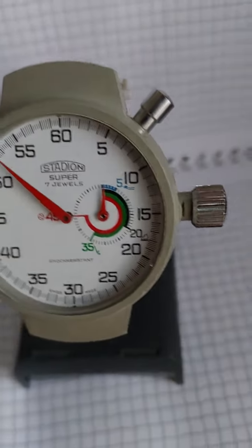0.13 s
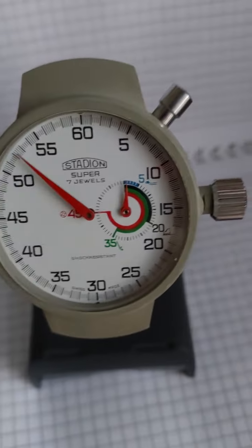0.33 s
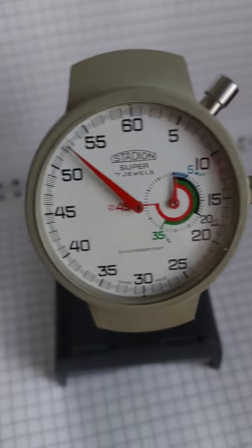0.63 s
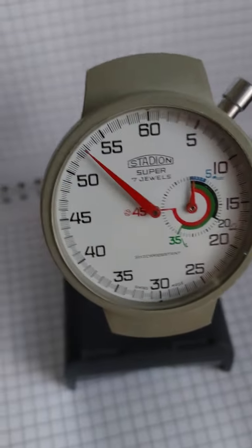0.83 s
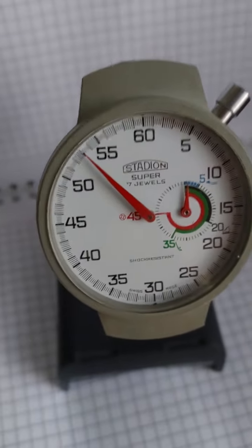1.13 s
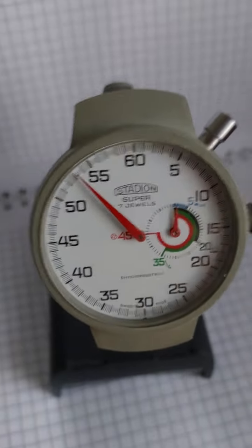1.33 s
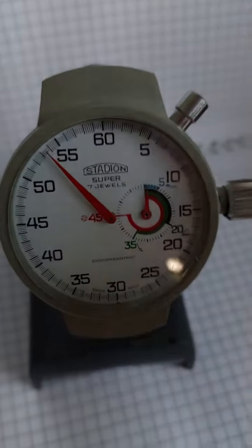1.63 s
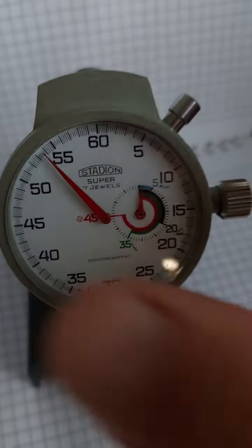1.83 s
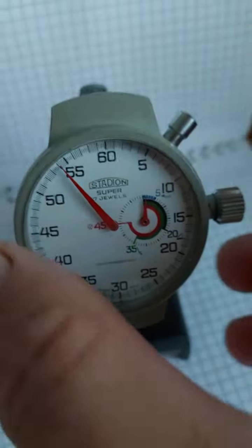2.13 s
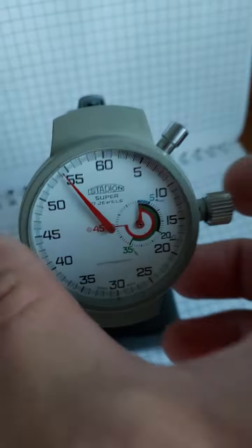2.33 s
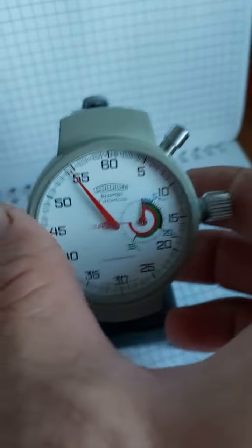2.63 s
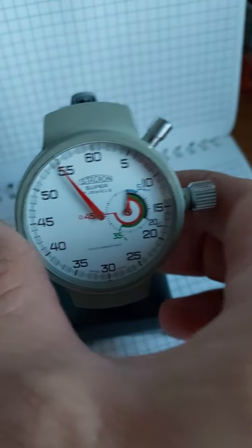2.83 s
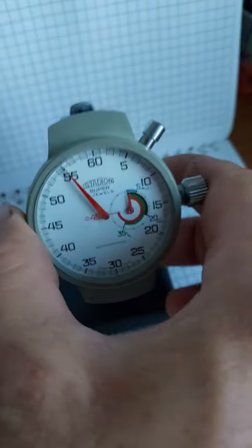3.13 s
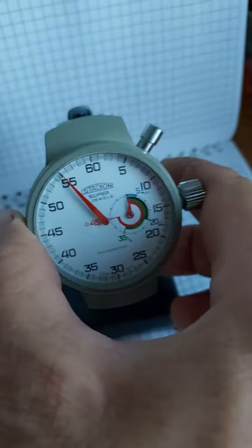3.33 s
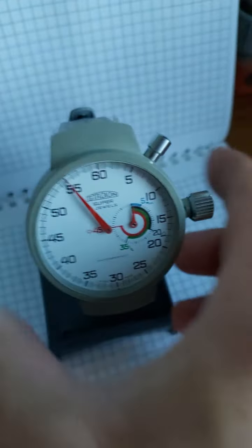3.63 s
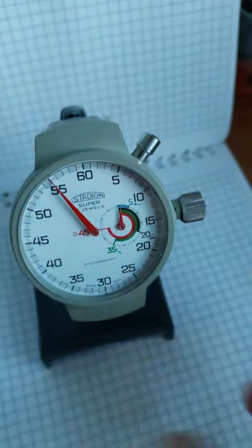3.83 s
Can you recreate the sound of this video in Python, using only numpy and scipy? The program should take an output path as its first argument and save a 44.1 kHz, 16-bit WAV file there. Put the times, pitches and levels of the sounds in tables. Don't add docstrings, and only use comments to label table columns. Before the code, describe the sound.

Soft rapid stopwatch ticking over low rumble, hiss and distant birds; a bump on the handheld microphone's right side, later a grip and sharp metal press stopping the ticks, then a lighter return click and loose rattle.

```python
import sys
import numpy as np
from scipy import signal
from scipy.fft import rfft, irfft
from scipy.io import wavfile
from scipy.ndimage import uniform_filter1d

SR = 44100
rng = np.random.default_rng(int(sys.argv[2]) if len(sys.argv) > 2 else 0)


def materialize(psi):
    bounded = np.clip(np.atleast_2d(psi).T, -1, 1)
    quanta = np.round(bounded * 32767).astype(np.int16)
    wavfile.write(sys.argv[1], SR, quanta)


def level_to_linear(level):
    exponent = np.asarray(level, float) / 20
    return 10 ** exponent


N = 176400

# t/s, level/dB
RUMBLE_SWELL = [(0, -65.5), (.18, -49.5), (.33, -69.5), (0.582, -50), (.7, -66), (.78, -56.5), (.95, -70.5),
                (1.08, -53), (1.45, -50), (1.53, -65), (1.6, -53), (1.85, -61.5), (2.02, -56), (2.23, -75),
                (2.38, -57.5), (3.201, -57), (3.85, -60), (4, -51)]
# f/Hz, level/dB
RUMBLE_TONE = [(20, -40), (36, -18), (58, 5.5), (68, -9), (95, -10), (180, -35.5), (600, -86.5)]

# f/Hz, left minus right/dB
HISS_PAN = [(180, -7), (550, -10), (1650, -5.5), (5000, -11.5), (15000, -7)]
# f/Hz, likeness/1
HISS_LIKENESS = [(100, 0.91), (800, 0.06), (4000, 0.16), (12000, 0.15)]
# f/Hz, density/dB
AIR_TONE = [(60, -21), (110, -3.5), (200, 1), (330, -8.5), (550, -5.5), (1000, -8.5), (1600, -18.5),
            (2600, -20.5),
            (4000, -15.5), (5500, -15.5), (7000, -19.5), (8300, -29.5), (10000, -24.5), (13000, -19),
             (15700, -20)]
# t/s, level/dB
MURMUR_SWELL = [(0, 4), (.3, 0), (.6, 3), (.8, -.5), (1.5, 2), (2.1, -1), (2.6, 1), (3, 3.5), (4, 3)]
HISS_DB = -67
HISS_EDGE_HZ, EDGE_HZ = 15950, 16900

# t/s, level/dB
TICK_NEARNESS = [(0, -55.5), (1, -56.5), (2, -57), (2.8, -58.5), (3.2, -59)]
# f/Hz, level/dB
TICK_TONE = [(3000, -39), (5200, -6), (6400, 1), (8500, -19), (11000, -1.5), (14500, -1.5), (15800, -1),
             (16500, -30.5)]
BEAT_S, FIRST_S, TOCK_EARLY_S, UNLOCK_S = .2, .186, .004, .012
TICK_UNLOCK_DB, TOCK_UNLOCK_DB, TOCK_DB, TICK_PAN_DB = -8.5, -24, -1.5, -9.5

# t/s, level/dB, f/Hz
CHIRPS = [(0.195, -66, 4864), (0.554, -70.5, 4830), (0.784, -64.5, 5074), (1.08, -66.5, 5210),
          (1.338, -68.5, 6150), (1.769, -79, 4640), (1.99, -68.5, 4570), (2.138, -74.5, 4460),
          (2.314, -68.5, 4600), (2.926, -68, 4695)]
# t/s, level/dB, f/Hz
SPARROW_NOTES = [(.235, -65, 4940), (.59, -63, 4810), (.788, -62, 3780), (.808, -62.5, 6330),
                 (0.815, -55.5, 4630), (.819, -57, 5370), (.835, -66, 5110), (1.083, -52, 5430),
                 (1.083, -62.5, 3990), (1.108, -58, 5430), (1.116, -67.5, 3910), (1.136, -66, 5440),
                 (2.03, -61, 4670)]
# t/s, level/dB, f/Hz
COOS = [
    (1.5, -64, 717),
    (1.69, -62, 750),
    (2.21, -71, 750),
    (2.4, -72, 755),
]
CHIRP_S, TRILL_PER_S, CHIRP_SPREAD, CHIRP_PAN_DB, COO_S = .085, 38, .36, -7.5, .12
BIRD_ROOM_DB, NOTE_ROOM_DB = 1.5, -7

# t/s, level/dB, f/Hz
THUDS = [
    (1.12, -62, 250),
    (1.592, -50, 245),
    (1.611, -50.5, 228),
    (1.632, -51, 237),
]
# t/s, level/dB, width/s, direction and size/1
PORT_PUSHES = [(1.212, -42.5, 0.0037, -1.7), (1.2434, -27.5, 0.0017, -1.8), (1.245, -21, 0.0058, 0.8),
               (1.247, -19.5, 0.00042, -0.72), (1.2479, -20, 0.0018, -0.88), (1.2505, -31.5, 0.0052, -1.26),
               (1.2553, -28.5, 0.0035, 1), (1.26, -38.5, 0.0044, 1), (1.264, -38, 0.0071, -1.6)]
# t/s, level/dB, clatter/s
SHELL_SNAPS = [(1.204, -62, .0015), (1.2096, -50, .0015), (1.2116, -49, .0005), (1.2144, -32.5, .0005),
               (1.2438, -46, 0.0013), (1.247, -20.5, 0.00071), (1.2482, -35.5, 0.0025),
               (1.2505, -38, 0.0038), (1.2658, -45.5, 0.00044), (1.284, -50.5, .002), (1.293, -54, 0.0043)]
# f/Hz, level/dB
SNAP_TONE = [(300, -13.5), (1200, 0), (3000, -4.5), (6400, -2.5), (8600, -14), (11000, -8), (15900, -10),
             (16900, -22)]
LEAK_DB = -41

# t/s, length/s, level/dB, slip rate/Hz
SQUEAK = (3.132, .046, -47, 480)
# f/Hz, width/Hz, level/dB
SQUEAK_BODY = [(917, 90, 0), (1410, 125, -3), (2880, 270, -8), (5490, 4400, -32.5)]
SQUEAK_CATCH_S = 0.015
# t/s, level/dB, clatter/s
GRIP = [
    (3.1782, -40.5, 0.0015),
    (3.216, -64.5, 0.0034),
    (3.233, -54, .003),
    (3.305, -45.5, 0.0027),
]
# f/Hz, level/dB
GRIP_TONE = [(300, -14.5), (600, -10), (1450, 0), (1850, 0.5), (2900, -6), (4600, -14), (9000, -16),
             (15500, -17)]

PRESS_S = 3.3424
# t/s, level/dB, clatter/s
PRESS = [
    (3.3406, -49.5, .001),
    (3.3422, -27, .0005),
    (3.3429, -13, 0.0011),
    (3.3439, -17, .0008),
    (3.3464, -32, 0.00079),
]
# f/Hz, level/dB
PRESS_TONE = [(200, -33.5), (1100, -10), (2200, -4.5), (3400, -13), (6200, -3), (8700, -14.5),
              (10300, -6.5), (11600, -12), (15800, -6), (16900, -24)]
# f/Hz, left minus right/dB
WATCH_PAN = [(300, 2.5), (800, 4.5), (1800, 8), (3000, 3), (4600, -6), (5900, -11), (8500, -8), (15000, 0)]
WATCH_LEAD_S, CASE_LEAD_S = 0.0002186, 0.00016
# f/Hz, level/dB, t60/s
CASE_MODES = [(136.5, -48, 0.37), (198, -41, 0.12), (274, -40.5, 0.16), (1183, -33.5, 0.032),
              (2080, -17.5, 0.013), (2427, -14.5, 0.024), (4650, -38.5, .08), (6100, -15, .012),
              (6520, -29, 0.056), (6800, -15.5, .01), (12660, -33.5, .03)]
# f/Hz, left minus right/dB
CASE_PAN = [(250, -0.5), (2000, 4.5), (2500, 2.5), (4600, -12.5), (6300, -6.5), (12600, -1)]
# f/Hz, level/dB, t60/s
SPRING_MODES = [(5254, -45, .27), (5308, -33.5, .25)]
# f/Hz, level/dB, t60/s
SPRING_HIGH_MODES = [(10490, -36.5, .19), (10645, -43, .12), (10300, -46, .1), (3400, -53, .25)]

# t/s, level/dB, clatter/s
BUTTON_RETURN = [
    (3.5696, -35.5, .0003),
    (3.5702, -19, 0.00035),
    (3.571, -25.5, 0.0015),
    (3.5732, -33.5, 0.00091),
]
# f/Hz, level/dB
RETURN_TONE = [(300, -26), (950, -11), (1900, -15), (3100, -6.5), (4600, -8.5), (7300, -2), (9000, -9.5),
               (12800, 1.5), (15800, -3), (16900, -22.5)]
# f/Hz, level/dB, t60/s
RETURN_MODES = [(7330, -24.5, .005), (13050, -36.5, 0.034), (9660, -41.5, .04)]
# f/Hz, left minus right/dB
RETURN_PAN = [(500, 3), (1400, -5), (2300, 2), (3700, -17.5), (5900, -15.5), (7500, -19), (9400, 4),
              (13000, -8.5)]
# t/s, level/dB, clatter/s
RATTLE = [(3.6295, -45, 0.00051), (3.6306, -34, 0.0011), (3.6328, -49.5, .001), (3.6355, -50, .001),
          (3.638, -50, .001), (3.6407, -41, .0008), (3.6428, -45.5, .001), (3.6463, -42, .0006),
          (3.6478, -43, .0008), (3.6566, -40.5, 0.00091), (3.6577, -36, 0.0012), (3.6598, -47, 0.0018),
          (3.667, -48, .001), (3.6725, -51, .001), (3.679, -46, 0.00076), (3.7375, -53, 0.0012)]
# f/Hz, level/dB
RATTLE_TONE = [(300, -18), (720, 6), (1100, -4), (2800, -1.5), (4500, -10.5), (7000, 0.5), (9000, -9.5),
               (12300, -3), (16000, -10.5)]
# f/Hz, left minus right/dB
RATTLE_PAN = [(350, -12), (700, 5.5), (1400, -7.5), (2600, 11), (3700, -8), (5900, -12), (9400, 0),
              (15000, -2.5)]

# f/Hz, t60/s
ROOM_T60 = [(300, 0.64), (1500, 0.14), (5000, 0.21), (12000, 0.13)]
ROOM_DB, RETURN_ROOM_DB, RATTLE_ROOM_DB = -10, -7, -13


def evened(x):
    return x / np.sqrt(np.mean(x ** 2) + 1e-20)


def read(points, hz):
    f, value = np.transpose(points)
    return np.interp(np.log(hz + 1), np.log(f + 1), value)


def add(mix, s, sound):
    part = mix[round(s * SR):][:len(sound)]
    part += sound[:len(part)]


def coloured(x, tone):
    log_gain = np.log(level_to_linear(read(tone, abs(np.fft.fftfreq(2048, 1 / SR)))))
    taps = np.fft.ifft(np.exp(np.conj(signal.hilbert(log_gain)))).real
    return signal.oaconvolve(x, taps / np.linalg.norm(taps))[:len(x)]


def clatter(rows, tone, t60, lumpy_db=3):
    out, t = np.zeros(N), np.arange(1024) / SR
    for s, db, hold in rows:
        grain, lumps = rng.standard_normal((2, len(t)))
        decay_db = -60 * np.maximum(t - hold, 0) / t60 - 4.5 * np.minimum(t / hold, 1)
        shape = np.minimum(t / .0001, 1) * level_to_linear(decay_db)
        burst = grain * level_to_linear(lumpy_db * evened(uniform_filter1d(lumps, size=24))) * shape
        for width in (40, 20):
            spectrum = rfft(burst)
            flat = spectrum / np.sqrt(uniform_filter1d(abs(spectrum) ** 2, width))
            burst = irfft(flat) * (t < hold + t60)
        add(out, s, level_to_linear(db) * burst * np.linalg.norm(shape) / np.linalg.norm(burst))
    return coloured(out, tone)


def ring(s, modes, rise_s=0.00099):
    out, t = np.zeros(N), np.arange(SR // 3) / SR
    tones = sum(level_to_linear(db - 60 * t / t60) * np.sin(2 * np.pi * hz * t) for hz, db, t60 in modes)
    add(out, s, tones * np.minimum(t / rise_s, 1))
    return out


def ports(x, pan, lead_s):
    hz = np.fft.rfftfreq(N, 1 / SR)
    half = read(pan, hz) / 2
    late = np.exp(-2j * np.pi * hz * lead_s)
    return irfft(rfft(x) * np.array([level_to_linear(half), level_to_linear(-half) * late]), N)


def room(x):
    taps = np.zeros((2, SR // 2))
    at = np.arange(160, SR // 2 - 20, 20)
    where = at + rng.integers(0, 20, (2, len(at)))
    np.put_along_axis(taps, where, rng.choice([-1., 1.], (2, len(at))), 1)
    hz, t, z = signal.stft(taps, SR, nperseg=128)
    decay = level_to_linear(-60 * t / read(ROOM_T60, hz)[:, None])
    tail = signal.istft(z * decay * (hz < HISS_EDGE_HZ)[:, None], SR, nperseg=128)[1]
    return signal.fftconvolve(x, tail / np.linalg.norm(tail[0]), axes=1)[:, :N]


def rumble():
    shared, own = rng.standard_normal(N), rng.standard_normal((2, N))
    tone = level_to_linear(read(RUMBLE_TONE, np.fft.rfftfreq(N, 1 / SR)))
    low = irfft(rfft(shared + 0.71 * own) * tone, N)
    low /= np.sqrt(uniform_filter1d((low ** 2).mean(0), size=6000))
    swell = np.interp(np.arange(N) / SR, *np.transpose(RUMBLE_SWELL))
    return low * level_to_linear(swell + np.array([[-1.5], [1.5]]))


def air():
    hz = np.fft.rfftfreq(512, 1 / SR)
    a, b, c, d, patches = rng.standard_normal((N // 256 + 3, len(hz), 5)).T
    patches = evened(uniform_filter1d(uniform_filter1d(patches, size=16, axis=0), size=12, axis=1))
    like = np.clip(read(HISS_LIKENESS, hz), -1, 1)[:, None]
    left = a + 1j * b
    right = like * left + np.sqrt(1 - like ** 2) * (c + 1j * d)
    half = read(HISS_PAN, hz)[:, None] / 2
    z = np.array([left * level_to_linear(half), right * level_to_linear(-half)])
    z *= level_to_linear(read(AIR_TONE, hz)[:, None] + 1.5 * patches)
    z *= (hz < HISS_EDGE_HZ)[:, None]
    frame_s = np.arange(z.shape[2]) * 256 / SR
    z[:, :24] *= level_to_linear(np.interp(frame_s, *np.transpose(MURMUR_SWELL)))
    return level_to_linear(HISS_DB) * evened(signal.istft(z, window="cosine", nperseg=512)[1][:, :N])


def escapement():
    rows = []
    for k, s in enumerate(np.arange(FIRST_S, PRESS_S, BEAT_S)):
        tock = k % 2
        db = np.interp(s, *np.transpose(TICK_NEARNESS)) + TOCK_DB * tock
        s -= TOCK_EARLY_S * tock
        unlock_db = TOCK_UNLOCK_DB if tock else TICK_UNLOCK_DB
        rows += [(s - UNLOCK_S + 0.0016, db + unlock_db, .004), (s, db, .001)]
    return ports(clatter(rows, TICK_TONE, 0.013, lumpy_db=-2.5), [(1000, TICK_PAN_DB)], 0.00029)


def birds():
    chirps, notes, coo = np.zeros((3, N))
    t = np.arange(0, .009, 1 / SR)
    swell, slide = np.sin(np.pi * t / t[-1]) ** 2, .5 - t / t[-1]
    for s, db, hz in CHIRPS:
        for u, pitch, fall, size in rng.random((60, 4)):
            when = np.floor(u * CHIRP_S * TRILL_PER_S) / TRILL_PER_S + 0.006 * size
            offset = pitch + fall - 1
            f = hz * (1 + CHIRP_SPREAD * offset + 0.28 * fall * slide)
            level = level_to_linear(db - 2.5 * size - 9 * abs(offset)) * 0.81 * np.sqrt(4 * u * (1 - u))
            add(chirps, s + when, level * swell * np.sin(2 * np.pi * np.cumsum(f) / SR))
    for s, db, hz in SPARROW_NOTES:
        f = hz * (1 + .2 * slide)
        add(notes, s, level_to_linear(db) * swell * np.sin(2 * np.pi * np.cumsum(f) / SR))
    t = np.arange(0, COO_S, 1 / SR)
    for s, db, hz in COOS:
        add(coo, s, level_to_linear(db) * np.sin(np.pi * t / COO_S) * np.sin(2 * np.pi * hz * t))
    far, near = (ports(x, [(4000, CHIRP_PAN_DB)], -0.00025) for x in (chirps, notes))
    echo = room(level_to_linear(BIRD_ROOM_DB) * far + level_to_linear(NOTE_ROOM_DB) * near)
    return far + near + echo + coo * np.array([[1], [-.6]])


def handling():
    creak, thud = clatter(SHELL_SNAPS, SNAP_TONE, 0.0034), np.zeros(N)
    for s, db, width, way in PORT_PUSHES:
        bump = np.sin(np.pi * np.arange(0, width, 1 / SR) / width) ** 2
        add(creak, s, way * level_to_linear(db) * bump)
    for s, db, hz in THUDS:
        thud += ring(s, [(hz, db, .12), (1.5 * hz, db - 8.5, .06)])
    return creak * level_to_linear(np.array([[LEAK_DB], [0]])) + thud * level_to_linear(np.array([[-4.], [1.5]]))


def squeak():
    out = np.zeros(N)
    s, length, db, rate = SQUEAK
    t = np.arange(0, length, 1 / SR)
    phase = np.cumsum(rate * level_to_linear(3.5 * rng.standard_normal(len(t)))) / SR
    slips = np.diff(np.floor(phase), prepend=0) + 0.091 * rng.standard_normal(len(t))
    body = sum(level_to_linear(g) * signal.filtfilt(*signal.iirpeak(hz, hz / w, SR), slips) for hz, w, g in SQUEAK_BODY)
    shape = np.where(t < SQUEAK_CATCH_S, 0.22 * t / SQUEAK_CATCH_S, 1 - (t / length) ** 3)
    add(out, s, level_to_linear(db) * evened(body) * shape)
    return out


def spring():
    modes = ring(PRESS_S + 0.00085, SPRING_MODES) + ring(PRESS_S, SPRING_HIGH_MODES, rise_s=0.057)
    return ports(modes, [(5300, -16.5), (10500, 21.0)], WATCH_LEAD_S)


def button():
    fingers = clatter(GRIP, GRIP_TONE, 0.0045) + squeak()
    press = clatter(PRESS, PRESS_TONE, 0.0077)
    case = ring(PRESS_S + .0003, CASE_MODES, rise_s=0.00031)
    back = clatter(BUTTON_RETURN, RETURN_TONE, .006)
    back += ring(BUTTON_RETURN[1][0], RETURN_MODES, rise_s=0.00024)
    loose = fingers + clatter(RATTLE, RATTLE_TONE, .003)
    sent = level_to_linear(ROOM_DB) * (press + 0.15 * case) + level_to_linear(RETURN_ROOM_DB) * back + level_to_linear(RATTLE_ROOM_DB) * loose
    near = ports(press, WATCH_PAN, WATCH_LEAD_S) + ports(case, CASE_PAN, CASE_LEAD_S)
    near += ports(back, RETURN_PAN, WATCH_LEAD_S / 2) + ports(loose, RATTLE_PAN, WATCH_LEAD_S)
    return near + spring() + room(sent[None])


def scene():
    return rumble() + air() + escapement() + birds() + handling() + button()


def low_pass(x):
    return signal.sosfilt(signal.butter(12, 17040, fs=SR, output="sos"), x)


def record(dry):
    limited = irfft(rfft(dry) * (np.fft.rfftfreq(N, 1 / SR) < EDGE_HZ), N)
    return low_pass(limited)


dry = scene()
out = record(dry)
materialize(out)
```